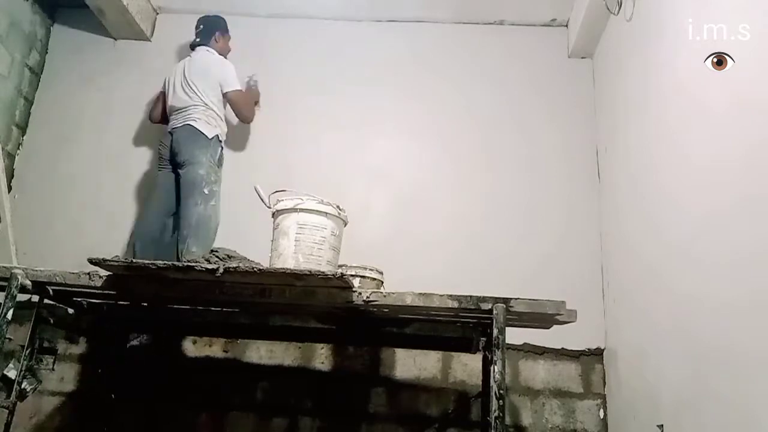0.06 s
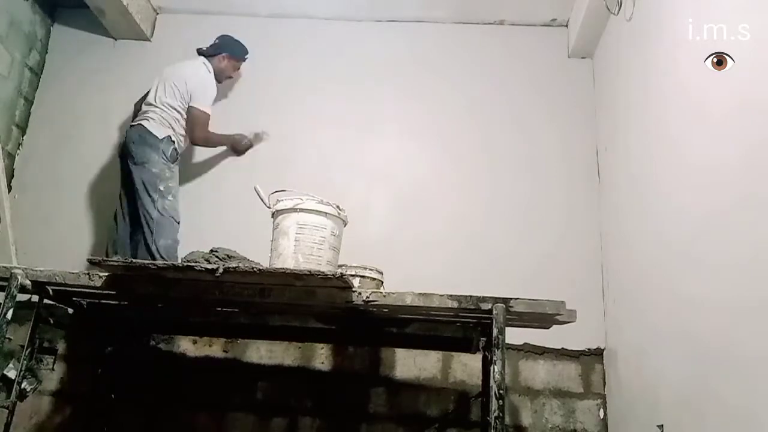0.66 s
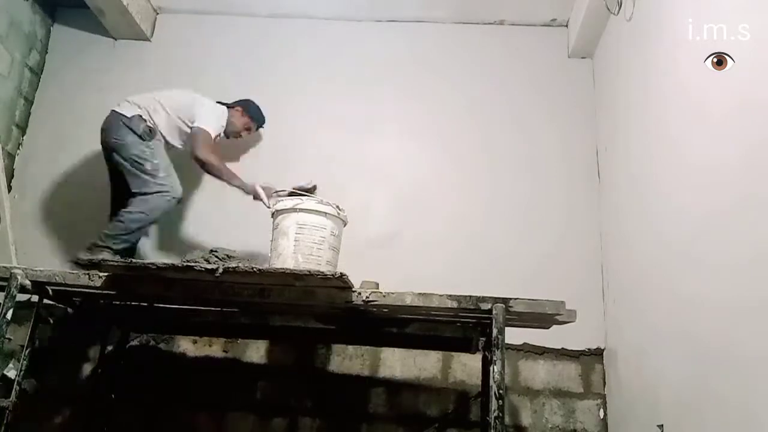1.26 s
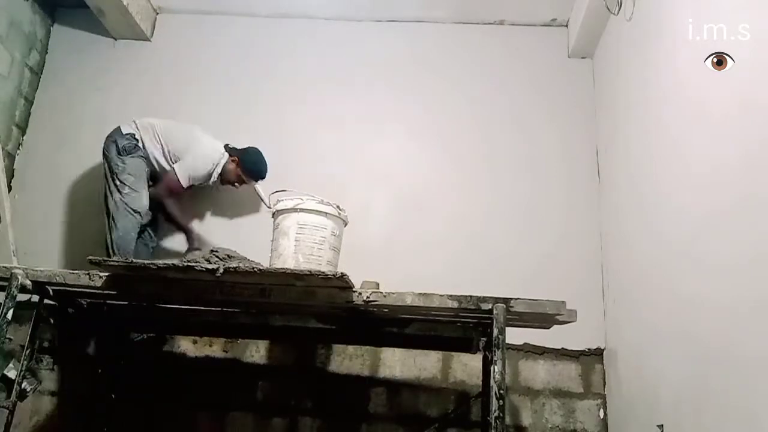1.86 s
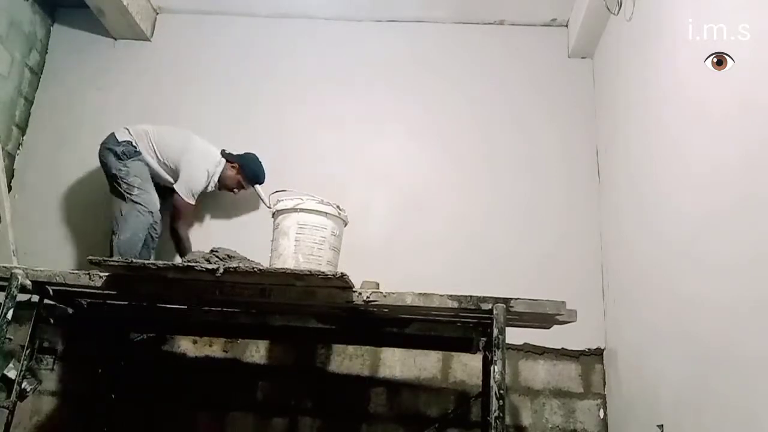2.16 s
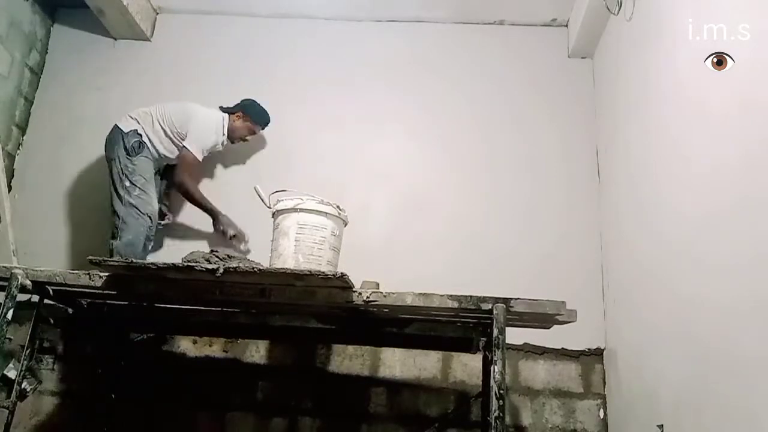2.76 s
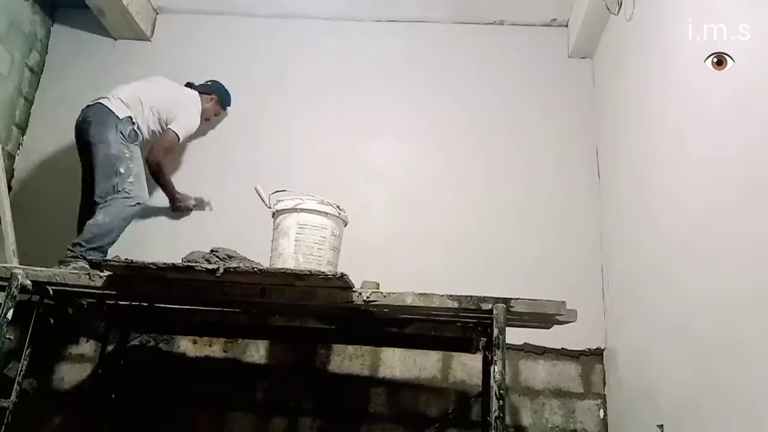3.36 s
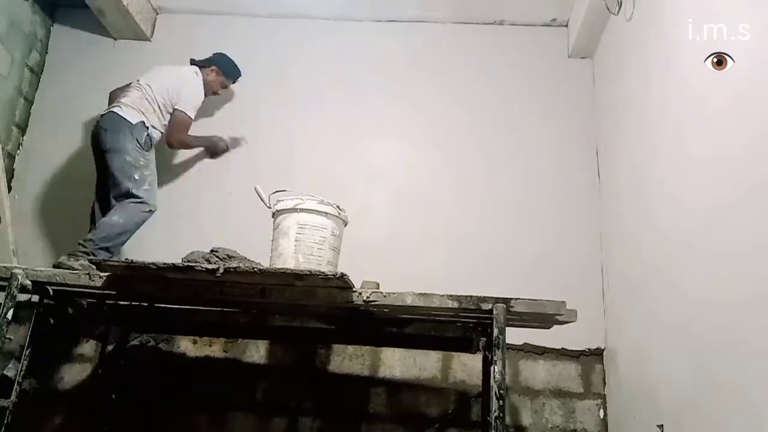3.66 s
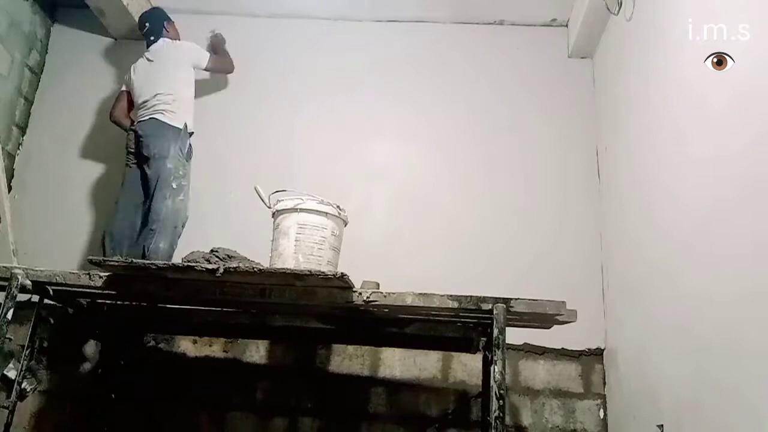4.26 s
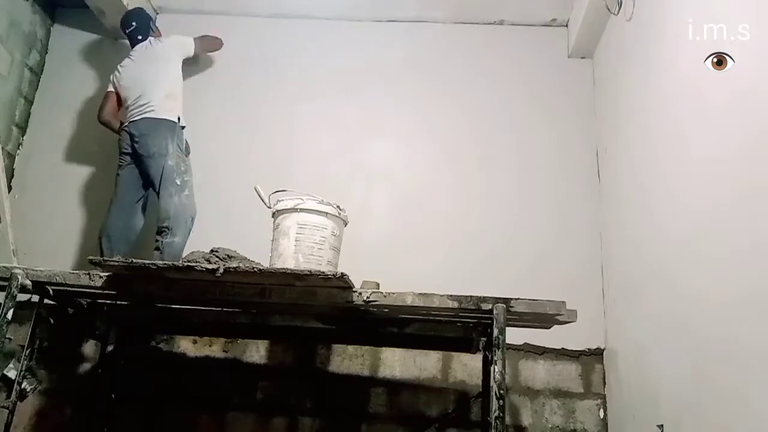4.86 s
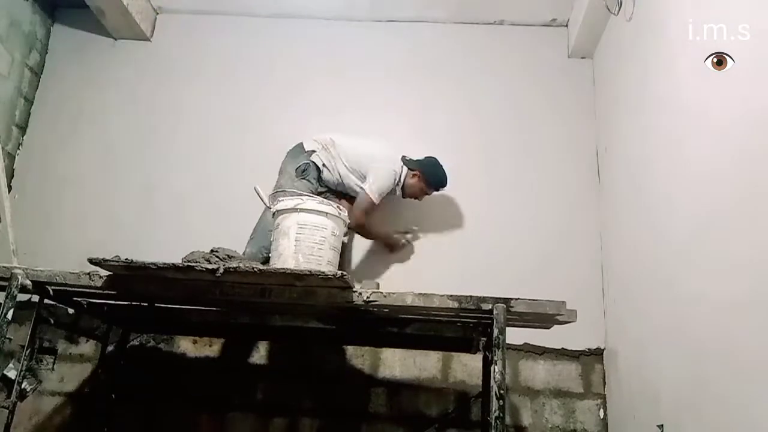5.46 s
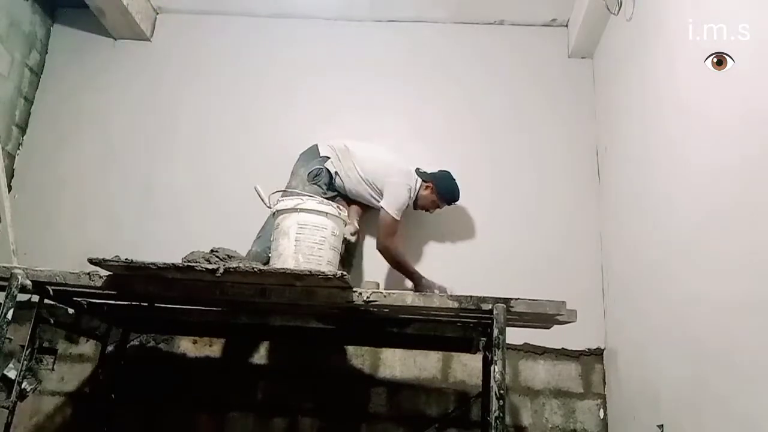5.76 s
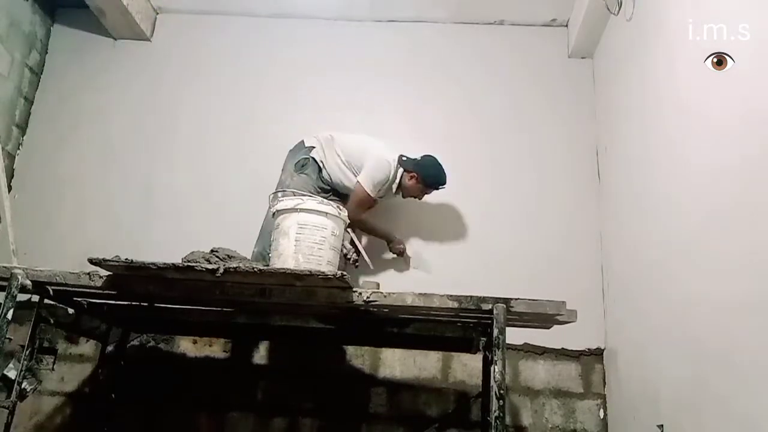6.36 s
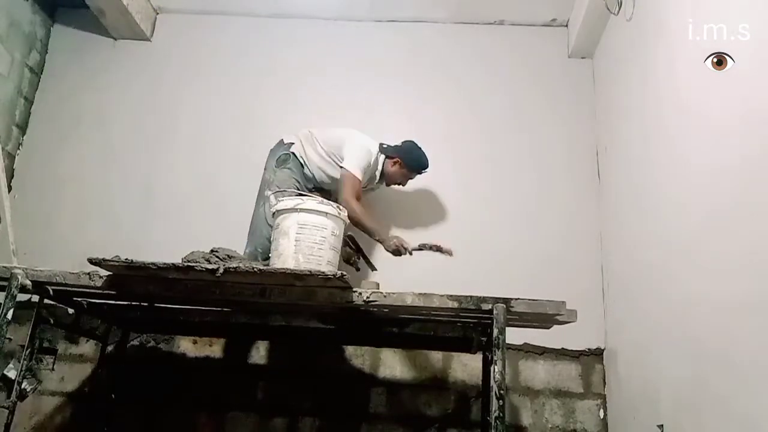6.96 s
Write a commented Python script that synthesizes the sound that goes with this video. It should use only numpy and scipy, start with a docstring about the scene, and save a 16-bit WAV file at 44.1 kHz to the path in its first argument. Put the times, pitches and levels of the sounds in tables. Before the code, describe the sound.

A steel blade works putty against a wall in a bare room, close to the microphone, over a faint steady hiss. A short click opens, followed by quick, irregular knocks, several a second, each a dull thud with a brief metallic ring and sandy crunch. Between them run short, softer, wet rasping strokes, some catching in a small squeak. Sharper knocks and snaps of the blade's edge stand out around 0.8, 1.3, 1.7 and 3.1 seconds, with a duller thud at 2.4. The ticking continues, turning lighter from 4 to 4.7 seconds. The loudest clacks land at about 4.9 and 5.4 seconds, and another knock follows near 5.9. After that come only quieter scrapes and taps. Around 6.7 to 6.9 seconds, four faint, quick falling chirps sound with two soft, low foot thumps on scaffold planks. One last scrape ends it at about 7 seconds.

```python
"""A bare room, one microphone close to a plasterer on a plank scaffold, scooping and spreading putty.
Each touch of the steel blade is a crunch of tiny contacts: the surface thuds, the blade rings, sand crackles.
Between knocks, short strokes bite, ease off and lift away, some catching on one pitch; the edge snaps.
A short click opens the sound; near the end come four faint falling chirps and soft, low foot thumps
on the planks. The microphone's steady hiss lies under it all."""
import sys
import numpy as np
from scipy import signal
from scipy.fft import rfft, irfft, next_fast_len
from scipy.io import wavfile

SR = 44100
rng = np.random.default_rng(int(sys.argv[2]) if len(sys.argv) > 2 else 0)


def digitize_waveform(pressure):
    """Quantize a signal to 16-bit integers and store it at the path in sys.argv[1].

    Rows of a 2-D input are taken as channels; values are limited to [-1, 1].
    """
    field = np.atleast_2d(pressure).T
    bounded = np.clip(field, -1, 1)
    quanta = np.round(bounded * 32767).astype(np.int16)
    wavfile.write(sys.argv[1], SR, quanta)


N = 318402

# a short opening click, then knocks of blade and boots (the last two rows are foot thumps):
# t/s, swell/s, thud f/Hz, thud level/dB, ring f/Hz, ring level/dB, clack level/dB, grit level/dB
KNOCKS_AND_THUMPS = [(0, 0.0022, 343, -44, 1280, -54.5, -54, -52),
                     (.035, 0.041, 473, -49.5, 1160, -47.5, -46, -46.5),
                     (.083, 0.0018, 180, -36, 745, -41.5, -39.5, -36),
                     (0.388, 0.002, 283, -34, 930, -41, -39.5, -46.5),
                     (0.602, 0.0068, 385, -37, 1330, -33.5, -38, -36.5),
                     (0.656, 0.0052, 395, -61, 1020, -54, -55, -55),
                     (0.816, 0.0046, 608, -29.5, 840, -29, -39.5, -40.5),
                     (1.21, 0.0083, 605, -48, 1115, -35, -38, -38),
                     (1.338, 0.0023, 298, -32.5, 1260, -27.5, -29.5, -40),
                     (1.685, 0.0034, 247, -32.5, 1030, -33.5, -37, -39.5),
                     (1.776, 0.0022, 223, -49, 1860, -56, -46, -43.5),
                     (1.806, 0.023, 470, -53, 1100, -44, -46, -47.5),
                     (1.838, 0.0083, 508, -49, 1400, -41, -37, -34.5),
                     (1.886, 0.0028, 654, -58, 1400, -34.5, -39, -38.5),
                     (2.021, 0.013, 170, -34.5, 990, -37.5, -43, -46),
                     (2.26, 0.0043, 350, -46.5, 1450, -44.5, -48, -46),
                     (2.399, 0.0063, 267, -26, 1260, -39, -42, -44.5),
                     (2.495, .0017, 590, -40, 1430, -39, -49, -56),
                     (2.649, 0.0036, 715, -50.5, 1400, -36, -30, -35.5),
                     (2.773, 0.0045, 404, -34.5, 780, -35, -37, -42),
                     (2.957, .0027, 700, -79, 1600, -55, -51, -50.5),
                     (2.987, 0.0034, 190, -39.5, 1380, -33.5, -48.5, -67),
                     (3.077, 0.0072, 590, -30, 780, -38, -38, -43),
                     (3.1, 0.0081, 710, -52, 1390, -39, -36, -39),
                     (3.123, 0.033, 730, -63, 1330, -38, -42, -43),
                     (3.273, 0.011, 714, -78, 1550, -52, -44, -50.5),
                     (3.453, 0.0071, 178, -46, 830, -40, -42, -41),
                     (3.578, 0.0082, 410, -54, 1405, -37, -40.5, -40.5),
                     (3.65, 0.0076, 510, -45, 1110, -32, -38, -40),
                     (3.691, 0.0079, 490, -55, 1120, -34, -44.5, -41.5),
                     (3.744, .0043, 687, -49, 1110, -41, -38.5, -41),
                     (3.844, 0.0049, 494, -45.5, 1320, -33, -35.5, -36.5),
                     (3.964, 0.004, 406, -72, 1670, -58, -48, -56),
                     (4.09, 0.0054, 170, -63, 1590, -66, -49.5, -56),
                     (4.176, 0.0024, 355, -49.5, 1040, -53, -59.5, -64),
                     (4.281, 0.00077, 660, -49, 1010, -43, -76, -72),
                     (4.406, 0.0027, 214, -43.5, 960, -45.5, -49, -53),
                     (4.558, 0.0095, 524, -51, 1290, -42, -45, -47.5),
                     (4.64, 0.0056, 265, -44, 860, -59.5, -62, -53),
                     (4.734, 0.0012, 290, -45, 1090, -56, -57.5, -55),
                     (4.834, 0.0046, 587, -45, 1490, -32, -41.5, -47),
                     (4.9, 0.017, 728, -45.5, 1160, -40.5, -39.5, -45.5),
                     (4.943, 0.013, 586, -44, 1370, -20, -29, -29.5),
                     (4.99, 0.015, 473, -63, 1480, -32, -32.5, -35.5),
                     (5.09, 0.0053, 300, -52, 1090, -49, -46.5, -49.5),
                     (5.302, 0.0063, 168, -34.5, 1175, -28, -33.5, -39.5),
                     (5.38, 0.0024, 170, -51.5, 1610, -54, -49, -54),
                     (5.418, 0.015, 535, -60, 1560, -26, -30, -33),
                     (5.434, 0.0041, 544, -44, 1350, -26.5, -30, -27),
                     (5.461, 0.0064, 267, -27, 1210, -42.5, -43, -50),
                     (5.594, .0013, 470, -65, 1540, -49, -47.5, -47.5),
                     (5.861, 0.0047, 388, -30.5, 970, -35, -44, -51),
                     (5.962, 0.0091, 708, -60, 1210, -44.5, -61, -61),
                     (6.206, 0.0031, 172, -78, 1380, -54.5, -60, -70.5),
                     (6.526, 0.0027, 170, -52, 834, -49.5, -61, -62),
                     (6.754, .004, 117, -56, 850, -81, -82, -79),
                     (6.845, 0.0048, 109, -60.5, 850, -81, -80, -76)]
# spectra of a knock's parts: f/Hz, level/dB
THUD_SPECTRUM = [(25, -5.5), (70, -6), (140, -1.5), (260, -2.5), (450, -3), (700, -5), (1000, -13.5),
                 (2000, -63.5)]
RING_SPECTRUM = [(350, -28), (650, -5), (950, 7), (1400, 4), (1800, 5.5), (2300, -18.5), (4000, -45.5)]
CLACK_SPECTRUM = [(1200, -27), (1900, 5), (2500, 5.5), (3800, 4.5), (4600, -0.5), (6500, -29.5)]
GRIT_SPECTRUM = [(3000, -9), (4500, -2.5), (6000, -2), (7800, -2.5), (9000, -16), (10500, -21.5),
                 (12000, -17), (14000, -10.5), (16000, -9.5)]
# strokes, before each layer's trim: t/s, length/s, rasp level/dB, sand hiss level/dB, rasp centre f/Hz
BLADE_STROKES = [(0.1, 0.061, -69.5, -60.5, 980), (0.215, 0.27, -76.5, -70, 1060),
                 (0.482, 0.072, -64, -62.5, 1240), (0.661, 0.1, -62, -61.5, 1430),
                 (0.837, 0.056, -66, -58, 1310), (0.912, 0.2, -70.5, -62.5, 1230),
                 (1.163, 0.015, -63.5, -82, 1440), (1.382, 0.064, -85, -58, 1480),
                 (1.452, 0.058, -51, -56.5, 1190), (1.556, 0.081, -57.5, -58.5, 1290),
                 (1.704, 0.096, -62, -55.5, 1176), (2.036, 0.16, -68.5, -55.5, 1400),
                 (2.285, 0.057, -57, -57.5, 1340), (2.503, 0.073, -52.5, -54.5, 1130),
                 (2.718, 0.185, -53.5, -58.5, 1040), (2.953, 0.113, -57.5, -61.5, 1420),
                 (3.214, 0.047, -51.5, -56.5, 1220), (3.317, 0.039, -62, -51.5, 1250),
                 (3.39, 0.038, -61, -56, 1400), (3.517, 0.073, -56.5, -61, 1180),
                 (3.786, 0.076, -62, -73, 1400), (3.9, 0.175, -79, -60.5, 1860),
                 (4.086, 0.045, -70, -59.5, 1700), (4.16, 0.092, -64, -59.5, 1110),
                 (4.302, 0.048, -53, -58, 1130), (4.431, 0.054, -47, -56.5, 1030),
                 (4.566, 0.16, -59, -63, 1200), (5.032, 0.049, -62, -57, 1210),
                 (5.136, 0.048, -56, -53.5, 1080), (5.216, 0.029, -57, -62.5, 1350),
                 (5.367, 0.04, -63.5, -57, 1420), (5.64, 0.038, -56, -60, 1680),
                 (5.693, 0.17, -65.5, -97, 1280), (5.957, 0.054, -54, -63, 1270),
                 (6.043, 0.034, -56, -69, 1180), (6.125, 0.042, -72.5, -76, 1350),
                 (6.285, 0.018, -58.5, -68, 1100), (6.395, 0.086, -66.5, -82, 1300),
                 (6.544, 0.073, -62, -65.5, 1540), (6.668, 0.066, -61, -61.0, 1343),
                 (6.978, 0.21, -58.5, -64.0, 1370)]
# spectra of the drag's rumble and of hiss (sand and microphone alike): f/Hz, level/dB
RUMBLE_SPECTRUM = [(25, 0.5), (80, 1), (200, -2.5), (550, 1.5), (900, 8), (2000, -52.5)]
HISS_SPECTRUM = [(700, -7.5), (2000, -28), (3200, -8), (4500, -0.5), (6000, 1), (7800, 1.5), (9000, -13),
                 (10500, -23), (12000, -14), (14000, -7), (16000, -13)]
# pauses with the blade off the wall: t/s, length/s
BLADE_LIFTS = [(0.186, .035), (1.131, .03), (1.973, 0.034), (2.224, 0.017), (2.925, 0.041), (3.194, 0.027),
               (3.804, 0.033), (4.344, 0.023), (4.774, 0.032), (5.539, 0.018), (6.219, 0.063),
               (6.325, 0.047), (6.88, 0.07)]
# pitched rubs, from high squelches to low board groans: t/s, length/s, f/Hz, level/dB before trim
PITCHED_RUBS = [(0.164, 0.027, 177, -61), (0.389, 0.025, 940, -44), (1.024, 0.042, 2800, -57.5),
                (1.063, 0.019, 610, -57), (1.273, 0.074, 594, -60), (1.706, 0.062, 174, -47.5),
                (1.913, 0.037, 1110, -61), (2.123, 0.036, 1060, -52.5), (2.8, 0.055, 1250, -56),
                (3.315, 0.031, 1320, -49.5), (3.695, 0.048, 1080, -55), (3.925, 0.02, 270, -59.5),
                (4.452, 0.029, 950, -45), (5.019, 0.07, 3070, -53), (5.649, 0.047, 1770, -54),
                (5.693, 0.037, 505, -58.5), (5.738, .043, 1340, -58), (5.832, .03, 1750, -57.5),
                (5.801, 0.048, 1200, -54), (6.567, 0.051, 1700, -53), (6.596, 0.066, 1050, -58.5),
                (6.713, 0.018, 1590, -53.5)]
# steel snapping edge-on against the surface: t/s, peak level/dB
EDGE_SNAPS = [(.817, -39), (1.3384, -21), (1.687, -24.5), (2.989, -35), (3.083, -29), (4.282, -59),
              (4.84, -30), (4.954, -24.5), (5.303, -36), (5.43, -25.5)]
# spectrum of a snap: f/Hz, level/dB
SNAP_SPECTRUM = [(3500, 15), (8000, -20), (10000, -13)]
# faint chirps: t/s, peak level/dB
FAINT_CHIRPS = [(6.726, -58), (6.763, -53), (6.801, -52), (6.838, -58)]


def from_db(db):
    """Decibels to gain."""
    return 10 ** (np.asarray(db) / 20)


def unit_rms(x):
    """Scale to unit rms."""
    return x / np.sqrt(np.mean(x ** 2) + 1e-20)


def colour(x, spectrum):
    """Causal (minimum-phase) filter with the given spectrum."""
    size = next_fast_len(len(x) + 4096) * 2
    hz, db = np.transpose(spectrum)
    bin_hz = np.arange(size // 2 + 1) * SR / size
    gain = from_db(np.interp(np.log(bin_hz + 1), np.log(hz), db))
    cepstrum = irfft(np.log(gain))
    cepstrum[1:size // 2] *= 2
    cepstrum[size // 2 + 1:] = 0
    return irfft(rfft(x, size) * np.exp(rfft(cepstrum)))[:len(x)]


def resonator(hz, width_hz):
    """Two-pole band-pass coefficients, gain 1 at the top."""
    r = np.exp(-np.pi * width_hz / SR)
    return (1 - r * r) / 2 * np.array([1, 0, -1]), [1, -2 * r * np.cos(2 * np.pi * hz / SR), r * r]


def resonate(x, hz, width_hz):
    """Pass x through one resonance."""
    return signal.lfilter(*resonator(hz, width_hz), x)


def gliding(x, hz, width_hz, block=128):
    """A resonance whose centre follows a curve."""
    out, state = np.zeros(N), np.zeros(2)
    for i in range(0, N, block):
        out[i:i + block], state = signal.lfilter(*resonator(hz[i], width_hz), x[i:i + block], zi=state)
    return out


def drift(per_s):
    """A smooth random wander of unit rms."""
    knots = rng.standard_normal(4096)
    return unit_rms(np.interp(np.arange(N) / SR * per_s, np.arange(len(knots)), knots))


def grains(size, spread_db):
    """Dense tiny contacts of very uneven strength."""
    noise = rng.standard_normal(size)
    return unit_rms(noise * from_db(spread_db * np.minimum(rng.exponential(1, size), 5)))


def add(out, start_s, sound):
    """Mix a sound in at its start time."""
    i = max(round(start_s * SR), 0)
    out[i:i + len(sound)] += sound[:N - i]


def microphone_hiss(level_db=-74.5):
    """The microphone's steady noise floor."""
    return from_db(level_db) * unit_rms(colour(rng.standard_normal(N), HISS_SPECTRUM))


def knock(swell_s, thud_hz, thud_db, ring_hz, ring_db, clack_db, grit_db):
    """Contact builds up, then dies away more slowly the more of the blow goes into the surface."""
    ring_t60_s, thud_t60_s = 0.059, 0.078
    thud_share = 1 / (1 + from_db(ring_db - thud_db) ** 2)
    t60_s = ring_t60_s + thud_share * (thud_t60_s - ring_t60_s)
    t = np.arange(8192) / SR
    force = np.minimum(t / swell_s, 1) ** 0.69 * from_db(-60 * np.maximum(t - swell_s, 0) / t60_s)
    push, flex, edge, sand = (force * grains(len(t), spread_db=0.66) for _ in range(4))
    # the struck surface booms at one pitch, which sags as the load comes off
    boom_hz = thud_hz * (0.92 + 0.1 * np.exp(-t / 0.021))
    boom = force * np.sin(2 * np.pi * np.cumsum(boom_hz) / SR)
    rattle = colour(resonate(push, thud_hz, width_hz=140) + from_db(-3) * push, THUD_SPECTRUM)
    thud = unit_rms(rattle) + from_db(-7) * unit_rms(boom)
    # the loaded blade favours a pitch set by where it lands; a boot barely rings
    singing = resonate(resonate(flex, ring_hz, width_hz=260), ring_hz, width_hz=1400)
    ring = colour(singing + from_db(-7.5) * flex, RING_SPECTRUM)
    clack = colour(edge, CLACK_SPECTRUM)
    grit = colour(sand, GRIT_SPECTRUM)
    parts = [(thud, thud_db), (ring, ring_db), (clack, clack_db), (grit, grit_db)]
    return np.sqrt(np.mean(force ** 2)) * sum(from_db(db) * unit_rms(part) for part, db in parts)


def knocks():
    """A short opening click, then knocks of blade and boots, with soft low foot thumps on the planks."""
    out = np.zeros(N)
    for start_s, *blow in KNOCKS_AND_THUMPS:
        add(out, start_s, knock(*blow))
    return out


def pressure(length_s, lift_t60_s, bite_s=0.01, ease_db=3.5):
    """One stroke: the blade bites, eases off along its way and lifts."""
    t = np.arange(int((length_s + lift_t60_s) * SR)) / SR
    eased_db = ease_db * (0.5 - np.minimum(t / length_s, 1))
    lifted_db = -60 * np.maximum(t - length_s, 0) / lift_t60_s
    return np.minimum(t / bite_s, 1) * from_db(eased_db + lifted_db)


def stroke_controls(rustle_rasp_db=-74.5, rustle_hiss_db=-66):
    """Rasp level/dB, hiss level/dB and rasp f/Hz over time: strokes on top of a faint sandy rustle."""
    rasp_power = np.full(N, from_db(rustle_rasp_db) ** 2)
    hiss_power = np.full(N, from_db(rustle_hiss_db) ** 2)
    pitch_points = []
    for start_s, length_s, rasp_db, hiss_db, hz in BLADE_STROKES:
        # as the blade lifts, the sand hisses on longer than the rasp
        add(rasp_power, start_s, (from_db(rasp_db) * pressure(length_s, lift_t60_s=0.058)) ** 2)
        add(hiss_power, start_s, (from_db(hiss_db) * pressure(length_s, lift_t60_s=0.08)) ** 2)
        pitch_points += [(start_s, hz), (start_s + length_s, hz)]
    rasp_hz = np.interp(np.arange(N) / SR, *np.transpose(sorted(pitch_points)))
    return 10 * np.log10(rasp_power), 10 * np.log10(hiss_power), rasp_hz


def sand_ticks(per_s, t60_s=0.034):
    """Lone sand grains crack under the edge, each a brief burst of noise."""
    cracks = (rng.random(N) < per_s / SR) * rng.uniform(0.29, 1, N)
    force = signal.lfilter([1], [1, -from_db(-60 / (t60_s * SR))], cracks + 1e-18)
    return colour(force * rng.standard_normal(N), HISS_SPECTRUM)


def sliding():
    """The blade drags through putty: a wet rasp that moves with its angle, sand hiss and a dull rumble."""
    rasp_db, hiss_db, rasp_hz = stroke_controls()
    grip_db = 2.4 * drift(per_s=85)   # the edge catches and lets go
    centre_hz = rasp_hz * np.exp(0.08 * drift(per_s=36))   # the blade's angle wanders
    rasp = gliding(grains(N, spread_db=3.5), centre_hz, width_hz=560)
    rasp = gliding(rasp, centre_hz, width_hz=840)
    hiss = colour(grains(N, spread_db=2.5), HISS_SPECTRUM)
    # coarser grains crunch at a restless, higher pitch
    crunch = gliding(grains(N, spread_db=4.5), 3100 * from_db(1.5 * drift(per_s=73)), width_hz=1100)
    rumble = colour(grains(N, spread_db=2), RUMBLE_SPECTRUM)
    # each level/dB is the stroke's own, a trim and any flutter
    layers = [(rasp, rasp_db - 1 + 3 * drift(per_s=70)),
              (hiss, hiss_db - 5.5),
              (sand_ticks(per_s=32), hiss_db - 7),
              (crunch, hiss_db - 9.5 + 4 * drift(per_s=50)),
              (rumble, (rasp_db + hiss_db) / 2 - 10.5 + 4.5 * drift(per_s=20))]
    return sum(from_db(db + grip_db) * unit_rms(layer) for layer, db in layers)


def contact_gain(dip_db=-10, fade_s=0.0086):
    """The sliding sound sinks whenever the blade leaves the wall."""
    t, gain = np.arange(N) / SR, np.ones(N)
    for start_s, length_s in BLADE_LIFTS:
        inside_s = np.minimum(t - start_s, start_s + length_s - t)
        lifted = np.clip(inside_s / fade_s + 0.5, 0, 1)
        gain *= from_db(dip_db * lifted)
    return gain


def rubs(trim_db=-1):
    """Friction swells and fades in a single narrow resonance."""
    out = np.zeros(N)
    for start_s, length_s, hz, db in PITCHED_RUBS:
        swell = np.hanning(int(length_s * SR)) ** 0.37
        friction = grains(len(swell), spread_db=3.5)
        tone = resonate(resonate(friction, hz, width_hz=0.2 * hz), hz, width_hz=0.61 * hz)
        add(out, start_s, from_db(db + trim_db) * unit_rms(swell * tone))
    return out


def snaps(spray_t60_s=0.0077):
    """The steel lands edge-on: a sharp click, then a quick spray of reflections off wall and boards."""
    out, t = np.zeros(N), np.arange(1024) / SR
    click = t == 0
    for start_s, db in EDGE_SNAPS:
        spray = from_db(-29) * rng.standard_normal(len(t)) * from_db(-60 * t / spray_t60_s)
        snap = colour(resonate(click + spray, hz=2300, width_hz=4600), SNAP_SPECTRUM)
        add(out, start_s, from_db(db) * snap / np.abs(snap).max())
    return out


def chirps(top_hz=3670, end_hz=2630, length_s=0.038):
    """Rough, narrow squeaks that drop quickly and level off."""
    out, t = np.zeros(N), np.arange(int(length_s * SR)) / SR
    falling_hz = end_hz + (top_hz - end_hz) * np.exp(-t / 0.011)
    swell = np.sin(np.pi * t / length_s)
    for start_s, db in FAINT_CHIRPS:
        rough_hz = falling_hz * (1 + 0.09 * drift(per_s=1800)[:len(t)])
        add(out, start_s, from_db(db) * swell * np.sin(2 * np.pi * np.cumsum(rough_hz) / SR))
    return out


def scene():
    """The work as it reaches the microphone, in mono, over the steady hiss."""
    return (microphone_hiss() + knocks() + contact_gain() * sliding() + rubs() + snaps() + chirps())[None]


def record(dry):
    """The microphone's signal is cut steeply above 15.8 kHz."""
    return signal.sosfilt(signal.ellip(12, 0.2, 80, 15800, fs=SR, output="sos"), dry)


dry = scene()
out = record(dry)
digitize_waveform(out)
```